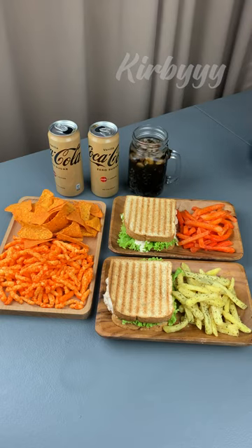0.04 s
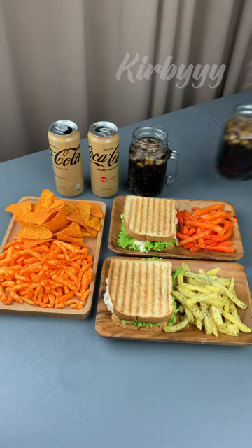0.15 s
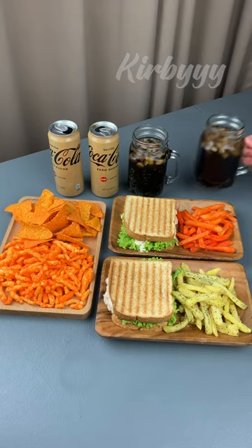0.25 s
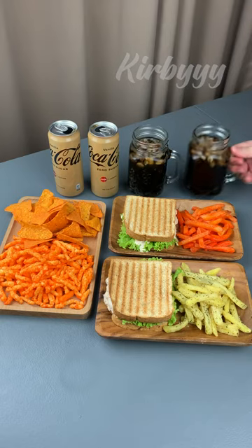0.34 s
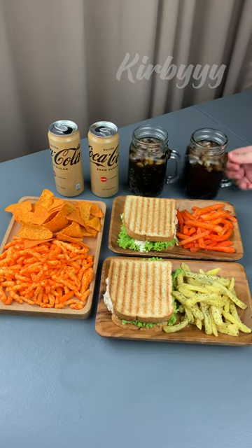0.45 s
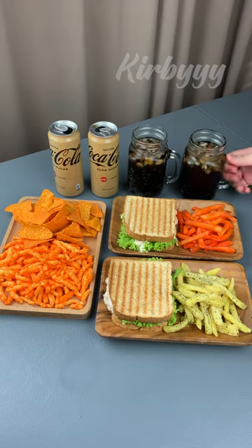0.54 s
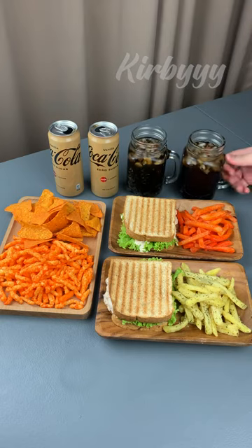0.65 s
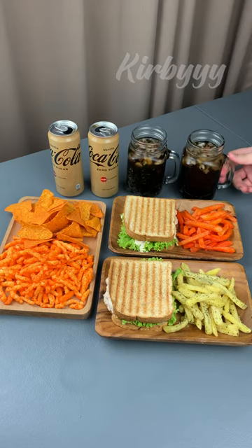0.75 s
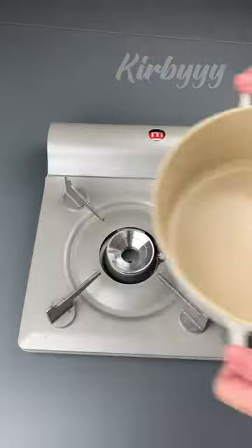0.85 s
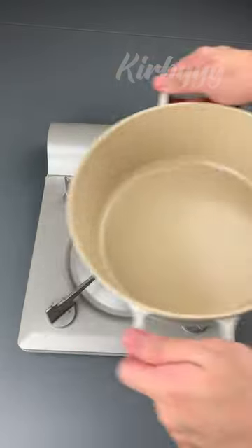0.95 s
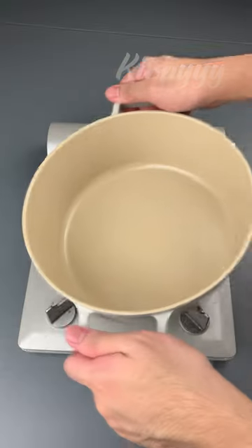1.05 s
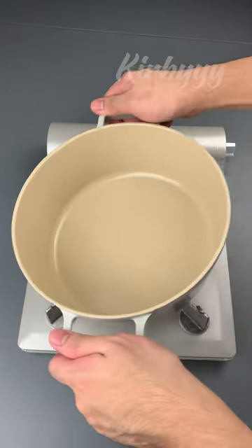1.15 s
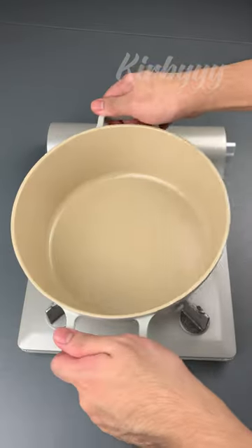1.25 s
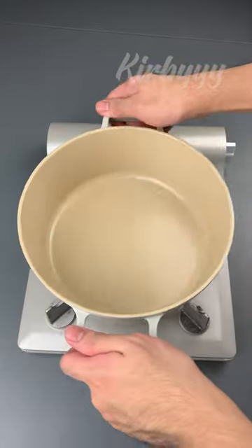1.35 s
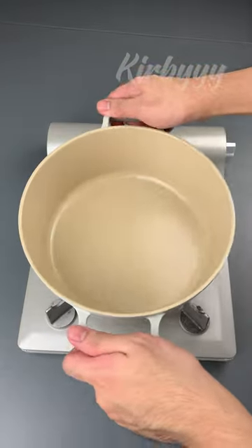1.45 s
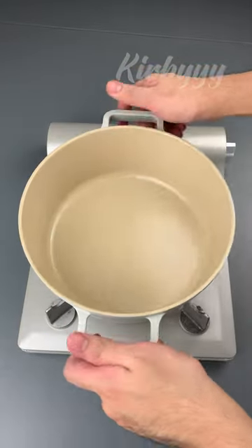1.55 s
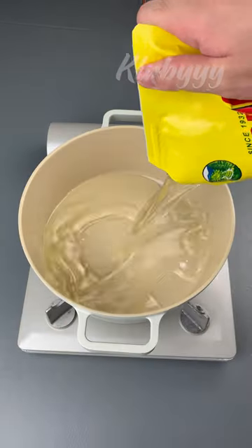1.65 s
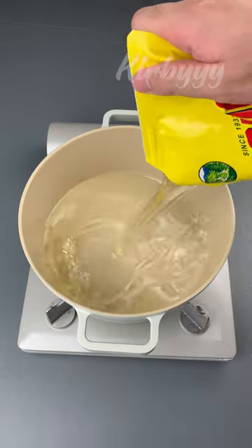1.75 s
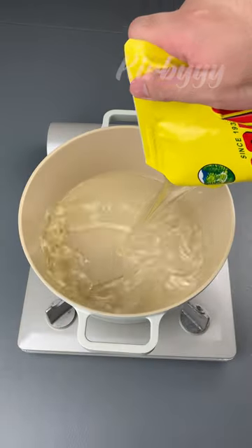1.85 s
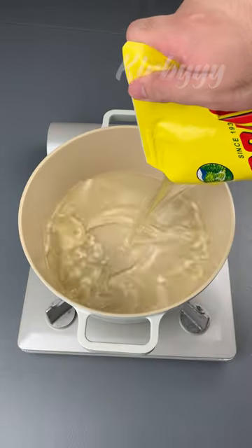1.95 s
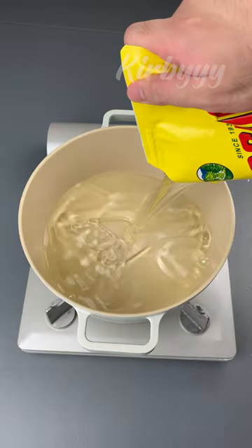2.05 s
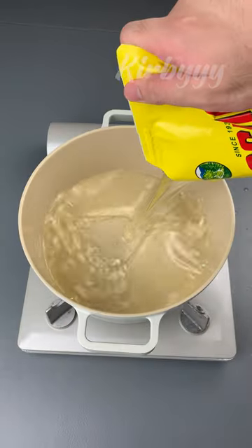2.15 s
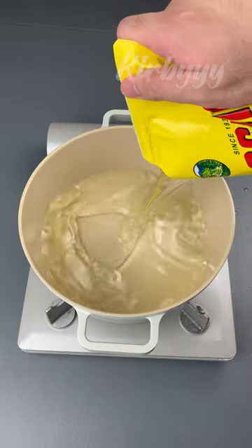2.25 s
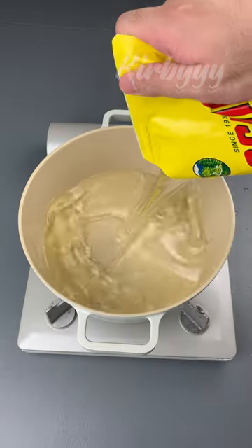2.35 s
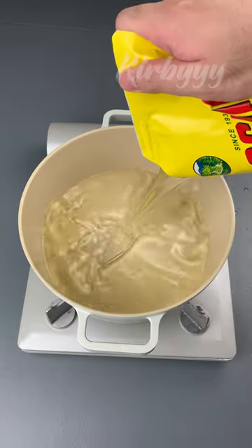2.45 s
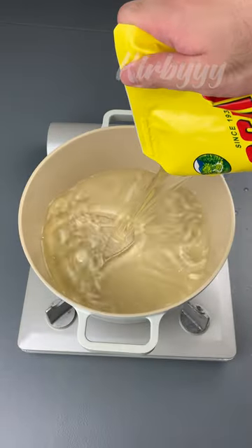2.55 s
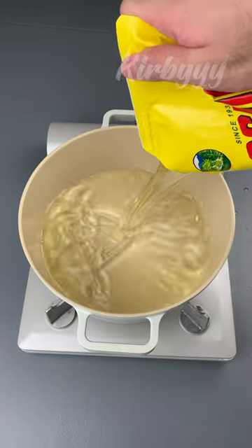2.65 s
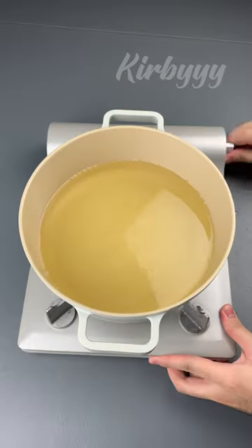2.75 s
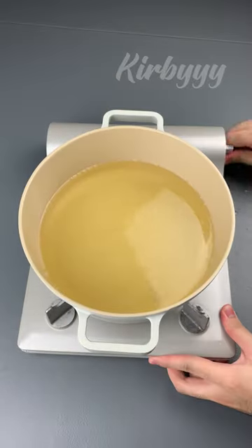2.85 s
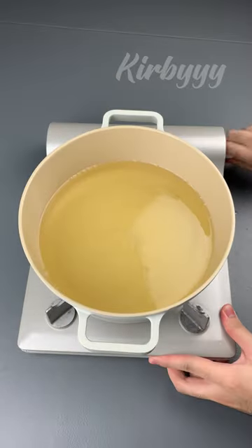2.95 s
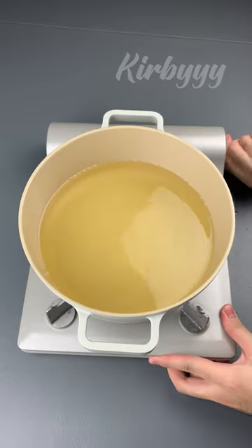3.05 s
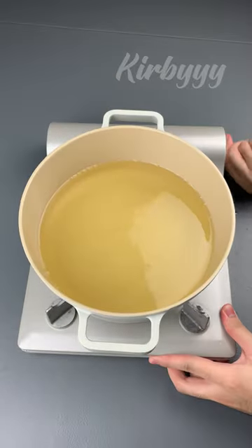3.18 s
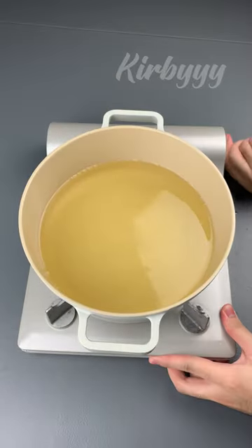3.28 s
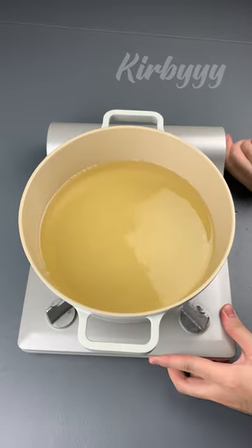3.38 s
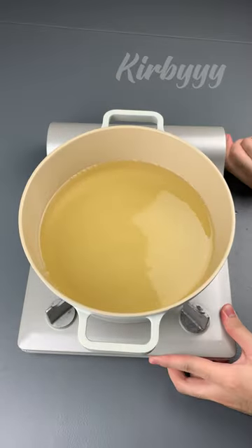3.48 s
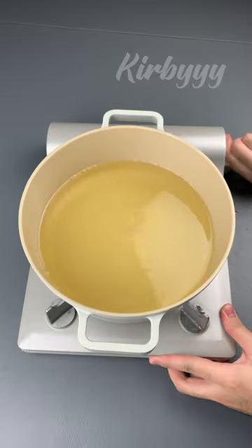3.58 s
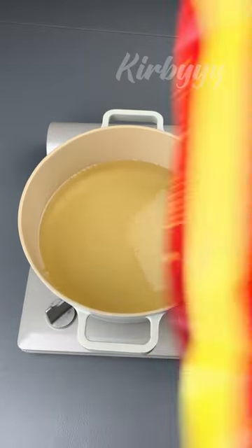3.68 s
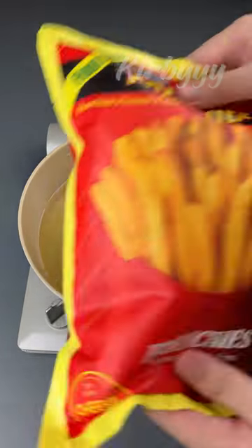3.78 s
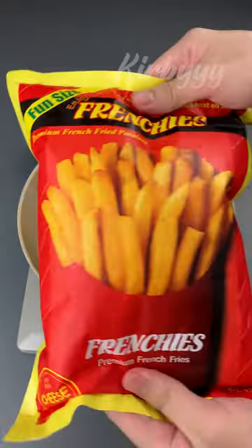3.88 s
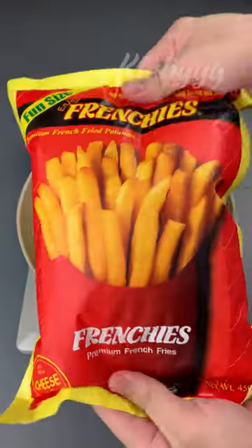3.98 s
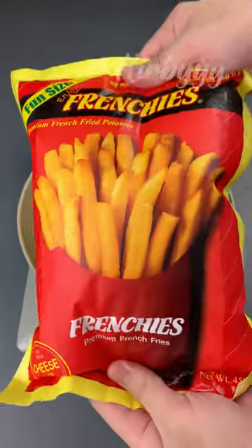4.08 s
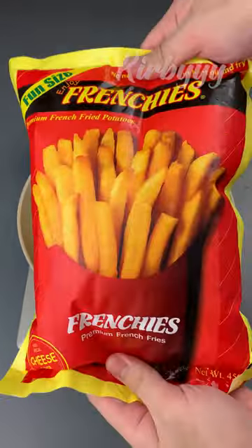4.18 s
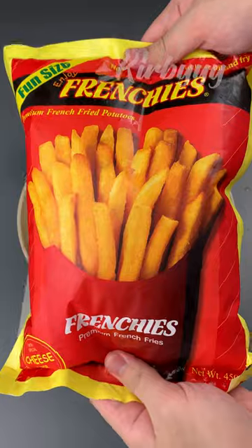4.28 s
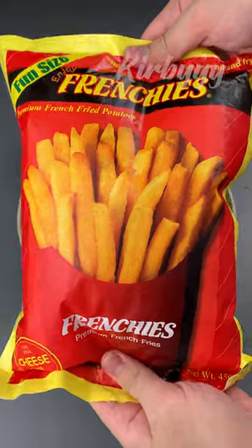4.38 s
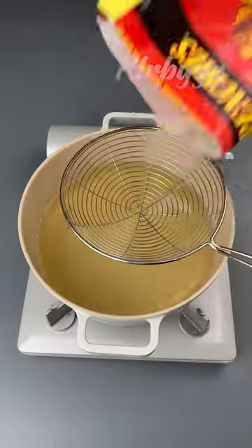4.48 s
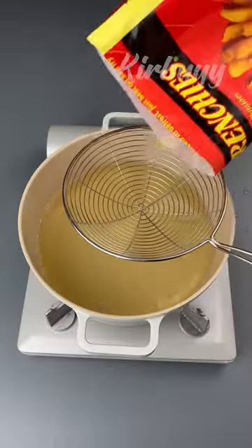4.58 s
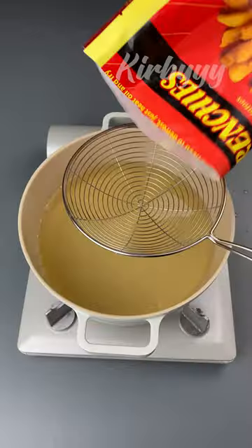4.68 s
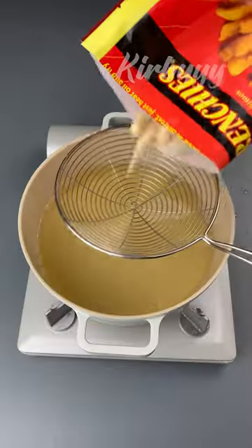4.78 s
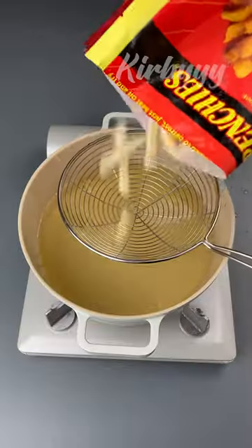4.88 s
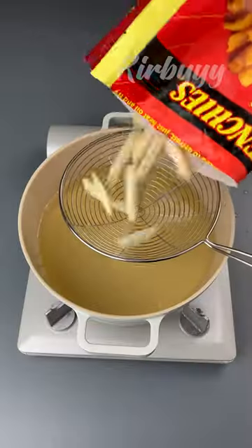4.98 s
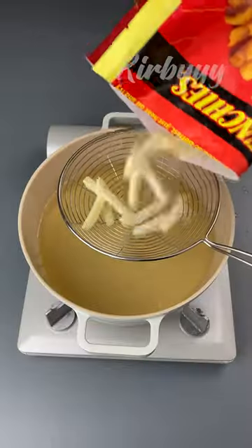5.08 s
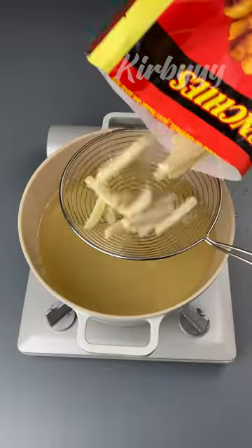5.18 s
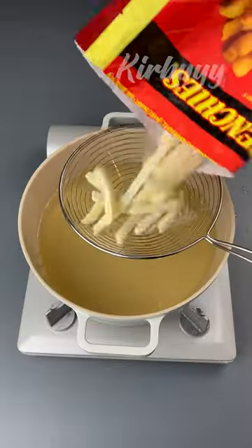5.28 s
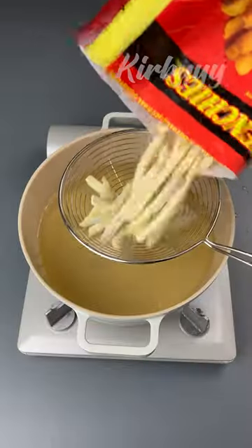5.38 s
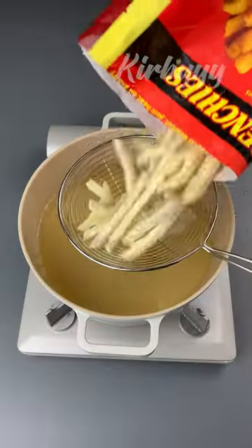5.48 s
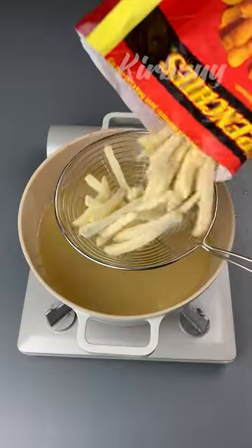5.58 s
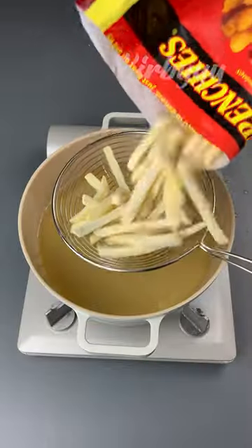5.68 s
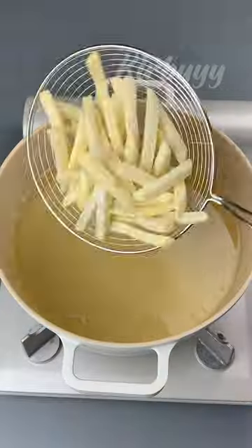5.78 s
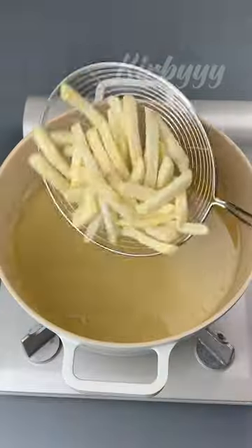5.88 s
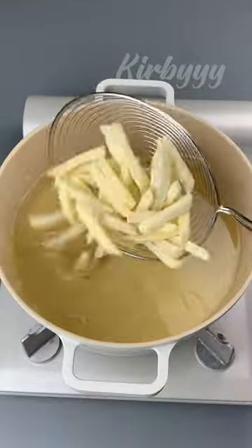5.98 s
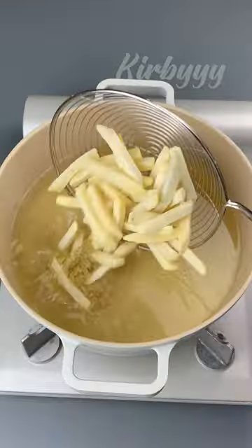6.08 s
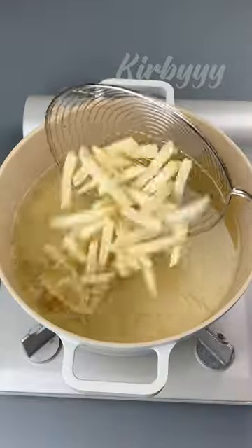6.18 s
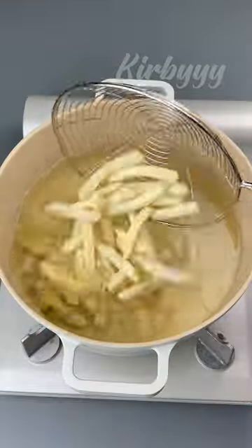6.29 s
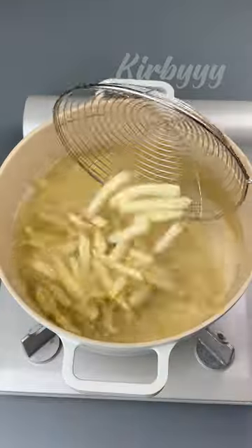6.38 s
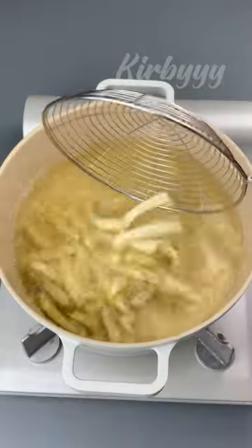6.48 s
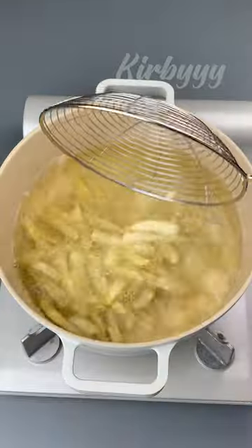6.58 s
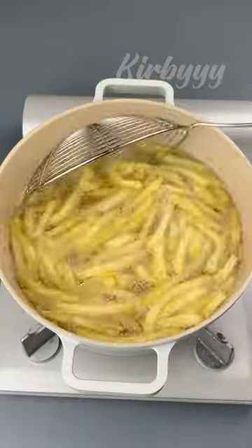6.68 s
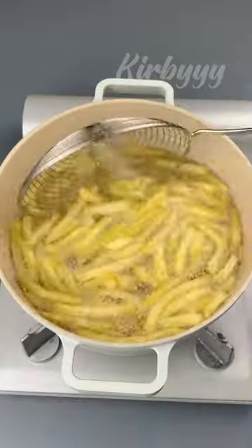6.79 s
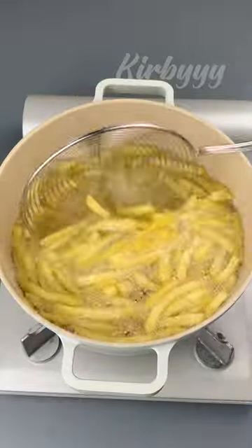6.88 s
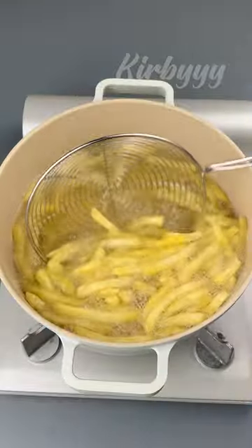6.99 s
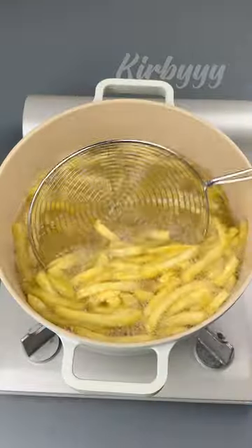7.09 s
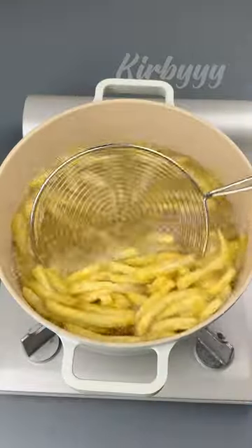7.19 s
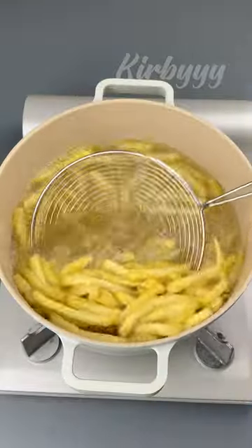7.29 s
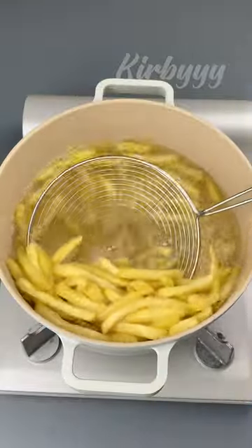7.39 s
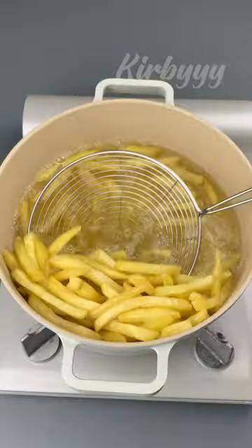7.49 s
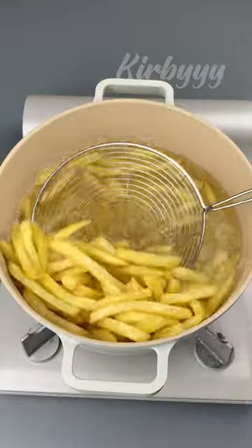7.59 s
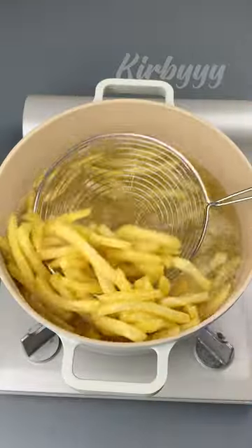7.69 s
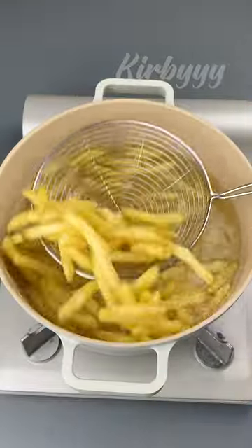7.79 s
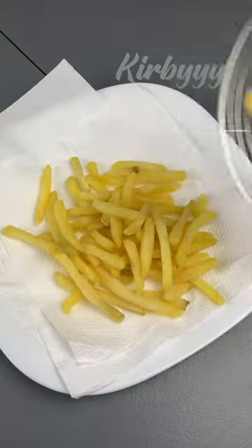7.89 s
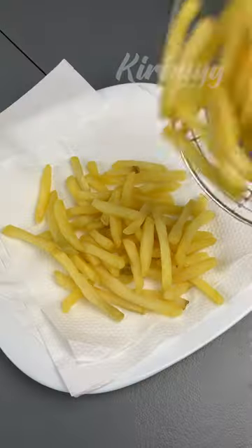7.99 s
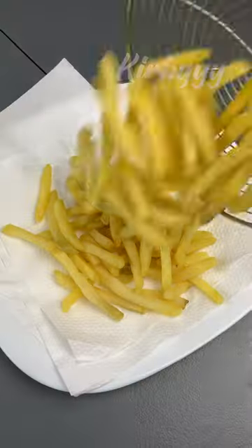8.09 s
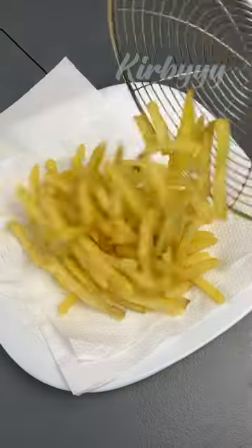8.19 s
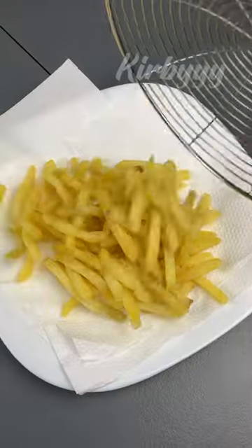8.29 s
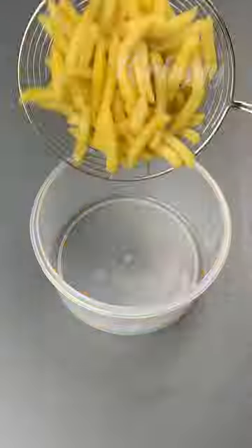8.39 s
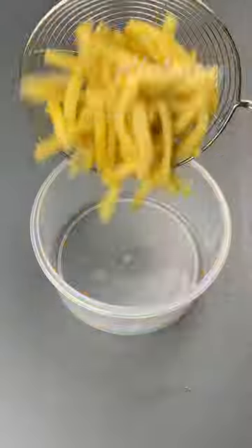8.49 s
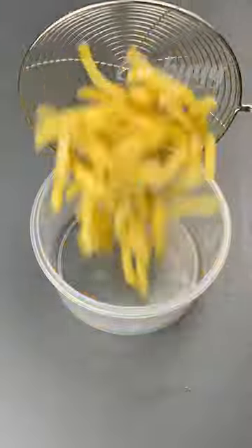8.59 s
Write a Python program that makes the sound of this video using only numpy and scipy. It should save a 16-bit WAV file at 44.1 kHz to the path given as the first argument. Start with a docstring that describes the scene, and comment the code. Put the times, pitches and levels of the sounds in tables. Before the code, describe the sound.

Abruptly cut kitchen moments: glass thud, ringing pot, oil pour, igniter snap, loud plastic crinkling, frozen fries clattering, fierce sizzle, rustling onto a plate, tub knocks.

```python
"""Frozen fries crackle out of a plastic bag, tumble into a wire strainer, sizzle in oil, slide onto a plate, drum in a tub.
Before them a glass of iced drink is set down, an iron pot lands on a camping stove, oil glugs and the burner lights.
Contacts are noise bursts with ringing modes; frying, plastic, flame and sliding are showers of tiny noise grains.
Bubbles, drip squeaks and glugs are gliding sines. The action plays in short moments with kitchen echo, each breaking
off abruptly, over steady room air and a low table rumble."""
import sys
import numpy as np
from scipy import signal
from scipy.fft import rfft, irfft
from scipy.io import wavfile
from scipy.ndimage import uniform_filter1d

SR = 44100
rng = np.random.default_rng(int(sys.argv[2]) if len(sys.argv) > 2 else 0)


def to_wav(s):
    """Save 16-bit WAV."""
    ch = np.atleast_2d(s).T  # columns
    pcm = np.round(np.clip(ch, -1, 1) * 32767)  # PCM
    wavfile.write(sys.argv[1], SR, pcm.astype(np.int16))


N = 381024

# Contacts; levels are relative, before each layer's own gain.
# ice shifting in the glass: [t/s, level/dB]
ICE_CLINKS = [(0.228, -42), (0.266, -37.5), (0.302, -40.5), (0.553, -17), (0.591, -30.5)]
# the glass meeting the table: [t/s, level/dB]
GLASS_KNOCKS = [(0.414, -3.5), (0.422, -1.5), (0.449, -9.5)]
# the pot landing and rocking: [t/s, level/dB, brightness tilt/(dB per octave)]
POT_KNOCKS = [(1.163, 3.5, -0.2), (1.176, 1.5, -3), (1.284, -16.5, -6), (1.373, -5.5, 5), (1.377, 0.5, 1.5),
              (1.409, -14.5, -0.5)]
# knob and igniter: [t/s, level/dB, added ring level of the stove/dB]
STOVE_CLICKS = [(2.744, -28.5, -1.5), (2.893, -18.5, -40), (3.053, -25.5, 1.5), (3.175, 6, -18),
                (3.509, -21.5, -1.5)]
# creases of the oil pouch: [t/s, level/dB]
POUCH_TICKS = [(1.678, -25), (1.718, -22), (1.727, -15.5), (1.785, -19.5), (1.815, -24), (1.887, -27),
               (1.929, -24.5), (2.06, -33), (2.16, -46), (2.573, -20)]
# the loudest creases of the bag: [t/s, level/dB]
BAG_SNAPS = [(3.719, 0), (3.730, 1), (3.7525, 2), (3.773, -1.5), (3.813, -2.5), (3.834, -7.5),
             (3.887, -10.5), (3.9, 0.5), (3.938, -12), (3.989, 4), (4.0135, -4.5), (4.02, 0), (4.05, 0.5),
             (4.057, -2), (4.083, 0.5), (4.107, -7), (4.1666, -5.5), (4.182, -4), (4.2, -11.5), (4.227, -5),
             (4.318, -5), (4.332, -6.5), (4.368, -4.5), (4.383, 1.5), (4.448, -12), (4.477, -4),
             (4.5076, -4.5), (4.528, 0.5), (4.6026, -3.5), (4.6516, -1), (4.702, -9), (4.758, -6.5)]
# frozen fries striking the wire: [t/s, level/dB]
FRY_DROPS = [(4.885, -17.5), (4.946, -6), (5.047, -10.5), (5.063, -18), (5.107, -16), (5.205, -8),
             (5.288, -14.5), (5.376, -7.5), (5.392, -20), (5.406, -16), (5.517, -11)]
# the strainer against the pot: [t/s, level/dB]
STRAINER_KNOCKS = [(6.862, -4), (7.848, -32.5)]
# the strainer against the plate: [t/s, level/dB]
PLATE_CLINKS = [(8.295, -9.5)]
# fries landing in the tub: [t/s, level/dB, added ring level of the tub/dB]
TUB_KNOCKS = [(8.585, 15, -12), (8.614, 1.5, -6), (8.617, 11, -19), (8.628, -6, 4), (8.633, 6.5, -1)]
# clumps of fries hitting the oil: [t/s, level/dB]
PLOPS = [(6.017, -29), (6.06, -27), (6.114, -20.5), (6.173, -19), (6.221, -24), (6.303, -12), (6.44, -23),
         (6.462, -33), (6.523, -27)]
# water drops spitting in the hot oil: [t/s, level/dB]
SPITS = [(5.898, -28), (6.072, -5), (6.115, -9)]

# oil slapping back in the spout: [t/s, level/dB]
GLUGS = [(1.944, -32), (2.051, -23.5), (2.274, -13), (2.48, 3)]
# the glug's dive above its lowest pitch (Hz), decay at 0 dB (s), rise in level that halves the decay (dB)
GLUG_DIVE_HZ, GLUG_T60, GLUG_HALVING_DB = 2420, 0.022, 18.5
# the loudest bubbles and drip squeaks: [t/s, level/dB, starting f/Hz, pitch rise/(octaves per s)]
BUBBLES = [(1.719, -22.5, 2565, 5.5), (1.814, -30.5, 3180, 2), (1.946, -31.5, 1143, 7),
           (2.061, -34.5, 2305, -4), (2.574, -15, 5250, 2), (2.601, -15, 5320, -0.5),
           (2.659, -13.5, 1015, 12.5), (2.740, -24, 697, 6.5), (6.058, -19, 923, 7), (6.223, -18, 927, 8),
           (6.308, -16, 1175, 10.5)]
BUBBLE_T60 = 0.087  # s

# What rings, as modes: [f/Hz, level/dB, t60/s]
TABLE_MODES = [(113.2, -4, 0.36), (183, -0.5, 0.38), (298, -13, 0.38), (393, -7.5, 0.42), (440, -9.5, 0.56),
               (820, -54, 5), (960, -11.5, 0.14), (1226, -17.5, 0.2), (1510, -27.5, 0.35)]
ICE_MODES = [(6360, -1.5, 0.1), (7150, -4, 0.11), (2480, 0.5, 0.057), (790, -11.5, .2)]
POT_MODES = [(101.9, 0.5, 0.58), (170, -5, 0.72), (217, -5.5, 0.5), (460, -14.5, 0.56), (550, 5.5, 0.17),
             (930, 0, 0.25), (1163, -6, 0.83), (1300, -5, 0.33), (1590, -6.5, 0.21), (1644, -7.5, 0.39),
             (1768, 1, 0.39), (2300, -15, .25), (2860, 1.5, 0.39), (3040, -15.5, 0.36), (3300, -18.5, 0.28),
             (3610, -16, 0.82), (4350, -1, 0.28), (4290, -8.5, 0.45), (4860, -16, .35), (5770, -6, 0.28),
             (5999, -7, 0.25), (6130, -5, .28), (6290, -11, .25), (7300, -18, .3), (7973, -18, .25),
             (10480, -20.5, 0.38), (11060, -30, .3), (14740, -29, 0.32), (15155, -19.5, 0.26)]
FULL_POT_MODES = [(109.4, -3.5, 0.71), (441, -2, 0.16), (530, -14, 0.2), (1160, -8, 0.47),
                  (1875, -25, 0.55), (3639, -26, 0.34), (6170, -24, 0.22)]
STOVE_MODES = [(106.3, -15.5, 0.33), (636, -6, 0.13), (777, -1.5, 0.069), (1160, -7.5, 0.075),
               (1330, -10, 0.064)]
PLATE_MODES = [(344, -1, 0.43), (780, -11.5, 0.66), (1300, -14, 0.66), (1888, -2.5, 0.46), (3305, -20, 0.3),
               (4075, -4, 0.19), (6654, -20, 0.26), (7140, -13, 0.26)]
TUB_MODES = [(282, -10, 0.071), (674, -6.5, 0.021), (1460, -9.5, 0.014), (1930, -6, 0.018),
             (2290, -20, 0.026), (3290, -17, 0.057)]
WIRE_MODES = [(1115, -6, 0.083), (1320, -0.5, 0.083), (2770, -5.5, 0.25), (4200, -10, 0.089),
              (6550, -4, 0.14)]  # the strainer's mesh
POT_HOLLOW = [(518, -6.5, 0.12), (577, 3, 0.087), (953, -8, 0.054), (1167, -2.5, .11)]  # the air above the oil

# Spectral colours of contacts and showers: [f/Hz, relative level/dB]
ICE_TONE = [(410, -15), (700, -3), (1350, 0), (3460, -13.5), (4860, -18), (6830, -29), (14600, -52),
            (16000, -33.5)]
GLASS_TONE = [(29, -31.5), (50, -6.5), (152, 5.5), (306, -9.5), (483, -6), (1240, -21), (1700, -22),
              (1910, -22), (3100, -22.5), (4670, -30.5), (5670, -37), (16000, -54)]
POT_TONE = [(35, -29.5), (60, -12.5), (121, -1.5), (315, -20), (527, 3), (767, -5.5), (882, -6.5),
            (1780, -3.5), (2190, -18.5), (2900, -3), (3120, -12.5), (5860, -7.5), (16000, -33.5)]
STOVE_TONE = [(88, -56), (150, -17), (431, -17.5), (745, -2.5), (1040, -7), (3620, -9), (4760, -14),
              (6140, -12), (11500, -17), (12900, -10.5), (16000, -23)]
CASING_TONE = [(200, -11), (700, 7.5), (1500, 4.5), (3500, 1.5), (7000, -2.5), (11000, -8.5), (16000, -3)]
POUCH_TONE = [(500, -15.5), (1200, 2), (2700, -3.5), (4500, -1), (7000, -7.5), (16000, -3.5)]
GLUG_TONE = [(120, -77), (200, 17), (1180, 1), (2470, -67), (2800, 4.5), (4770, -9), (6520, -5),
             (8900, -50), (16000, -20.5)]
FLAME_TONE = [(29, -61), (50, -46), (113, 0), (139, 6), (531, -0.5), (570, -4), (639, -8), (1070, -20),
              (1500, -17), (1950, -22), (3300, -120)]
BAG_TONE = [(47, -31), (80, -4.5), (369, 3), (702, 0), (1050, 7.5), (1400, -7), (3700, -14.5), (4730, -7.5),
            (6170, -11), (8990, -42), (10500, -17), (13100, -54), (16000, -13.5)]
BAG_HOLLOW = [(120, -14), (350, 1), (1000, -13), (2000, -1), (4000, -1.5), (16000, -26)]
SNAP_TONE = [(100, -10), (400, -9), (1000, 9.5), (3000, 4), (6000, 5.5), (16000, 2)]
TUMBLE_TONE = [(35, -31), (60, -18), (168, -1.5), (299, -5.5), (550, -4), (685, -10), (826, -3),
               (1130, -0.5), (1490, -7), (2500, -17.5), (3250, -34), (5500, -120)]
RUSTLE_TONE = [(1000, -9), (2200, -2), (3500, -1), (5000, 1), (7000, -0.5), (9000, 1), (12000, 0),
               (15200, 1), (16000, -3)]
FIZZ_TONE = [(900, -20), (1800, -5), (3300, -2), (5000, -2.5), (7000, -0.5), (9000, 1.5), (13000, 1.5),
             (15500, 3), (16000, -17)]
CHURN_TONE = [(150, -59.5), (250, -17.5), (486, -8.5), (572, -4), (699, -6), (1150, -7), (1430, -13),
              (2200, -15), (2860, -77), (4840, -120)]
SPLASH_TONE = [(150, -10), (450, -5.5), (1300, 5.5), (3000, -1), (6000, -27)]
STRAINER_TONE = [(47, -40), (80, 11), (451, -28), (877, -15), (1140, -3), (1460, -18), (6890, -13.5),
                 (8790, -28), (11000, -11), (16000, -37)]
PLATE_TONE = [(290, -42), (500, -6.5), (1180, -26), (1900, 4.5), (2570, -16), (3390, 11.5), (4600, -30),
              (6510, 2), (8830, -27), (16000, -45)]
TUB_TONE = [(47, -57), (80, -13), (277, 4), (471, -9), (1090, -19), (1430, -7), (3320, -24), (4730, -19.5),
            (16000, -46)]
THUD_TONE = [(18, -43.5), (30, -24), (57, -2.5), (102, -0.5), (168, -3.5), (198, -9.5), (367, -19.5),
             (400, -15), (520, -46.5), (880, -120)]
# still room air: [f/Hz, relative level/dB]
FLOOR_TONE = [(15, -43.5), (25, -1.5), (84, 9.5), (714, -20), (1190, -17.5), (1330, -15), (6380, -27),
              (9320, -27), (14800, -25.5), (16000, -35.5)]
FLOOR_DB = -58.5

# Gestures, each one row: [t/s, hold/s, level/dB]
POUR = (1.62, 0.97, -55.5)
FLAME = (3.19, .3, -28.5)
FIRST_DROPS = (5.83, 0.17, -56.5)
DUNK = (5.91, 0.21, -24)
SIMMER = (6.69, 1.2, -42)
SLIDE = (7.86, 0.31, -32.5)
SPILL = (8.05, 0.099, -26.5)
TIP = (8.44, .2, -34)
LANDING = (8.58, .06, -16)
# squeezes of the bag: [t/s, hold/s, level/dB]
SQUEEZES = [(3.703, .13, -16.5), (3.88, 0.024, -15), (3.984, 0.05, -18.5), (4.18, 0.051, -23.5),
            (4.365, 0.091, -29.5)]
# shakes that send fries out of the bag: [t/s, hold/s, knocking level/dB, scraping level/dB]
SHAKES = [(4.595, .005, -20.5, -41), (4.645, 0.012, -18.5, -29.5), (4.706, 0.13, -25.5, -35.5),
          (4.89, 0.14, -31.5, -22.5), (5.018, 0.4, -24, -27.5), (5.509, 0.02, -26, -24),
          (5.553, 0.26, -30, -33.5)]
# hands moving things on the table: [t/s, hold/s, level/dB]
HANDS = [(0.69, 0.75, -39), (2.7, 7.1, -39)]

# how long the kitchen echoes: [f/Hz, t60/s]
ROOM_T60 = [(100, 1), (400, 0.68), (1500, 0.62), (4000, 0.54), (8000, 0.41), (16000, 0.12)]
# stereo width: [f/Hz, side gain/dB]
WIDTH = [(100, -22), (400, -5), (1000, -5.5), (2500, 4.5), (5000, -34.5), (16000, -13)]
# phase between left and right: [f/Hz, phase/rad]
STEREO_PHASE = [(0, 0), (500, -.55), (1500, -.6), (2500, .6), (3800, 1.5), (4700, 3.14), (16000, 19.9)]
EDGE_HZ = 16000  # upper band limit


def amp(db):
    """Decibels to gain."""
    return 10 ** (np.asarray(db) / 20)


def evened(x):
    """Scales to rms 1."""
    return x / np.sqrt(np.mean(x ** 2) + 1e-20)


def read(points, hz):
    """Reads a table on a log-frequency axis."""
    f, value = np.transpose(points)
    return np.interp(np.log(hz + 1), np.log(f + 1), value)


def add(mix, s, sound):
    """Mixes a sound in at time s."""
    part = mix[max(round(s * SR), 0):][:len(sound)]
    part += sound[:len(part)]


def dying(t, t60):
    """Falls by 60 dB in t60 seconds."""
    return np.exp(-np.log(1000) * t / max(t60, 1e-3))


def coloured(x, tone, tilt_db=0, size=2048):
    """Causal filter of unit energy shaped by the tone, tilted in dB per octave (easing off in the bass)."""
    hz = np.fft.rfftfreq(2 * size, 1 / SR)
    level_db = read(tone, hz) + tilt_db * np.log2(hz + 200)
    # folding the cepstrum gives minimum phase: the energy comes first
    cepstrum = irfft(np.log(amp(level_db) + 1e-6))
    cepstrum[1:size] *= 2
    cepstrum[size + 1:] = 0
    taps = irfft(np.exp(rfft(cepstrum)))[:size]
    return signal.oaconvolve(x, taps / np.linalg.norm(taps))[:len(x)]


def uneven(tone, depth_db, count=14):
    """A colour with chance humps and dips: no two creases or contacts sound quite alike."""
    hz = np.geomspace(60, 16000, 2 * count)
    return np.transpose([hz, read(tone, hz) + depth_db * rng.standard_normal(len(hz))])


def blows(rows, tone, gain_db, t60, tilt_db=0, modes=(), ring_db=0, rise_s=0.0006, vary_db=0, size=32768):
    """Each contact is a brief dense clatter, together with the dying ring of the object's modes."""
    out, t = np.zeros(N), np.arange(size) / SR
    partials = [amp(db) * dying(t, ring_s) * np.sin(2 * np.pi * hz * t) for hz, db, ring_s in modes]
    span = t[:size // 4]
    settings = np.broadcast(tilt_db, ring_db + np.zeros(len(rows)))
    for (s, db, *_), (tilt, ring) in zip(rows, settings):
        clatter = rng.standard_normal(len(span)) * dying(span, t60) * (1 - np.exp(-span / rise_s))
        colour = uneven(tone, vary_db) if vary_db else tone
        add(out, s, amp(db + gain_db) * coloured(clatter, colour, tilt))
        if modes:  # each mode takes a chance sign, as if struck in another place
            add(out, s, amp(db + ring) * sum(rng.choice([-1, 1]) * p for p in partials))
    return out


def grains(level, tone, gain_db, per_s, spread_db, t60):
    """A shower of tiny noise bursts of uneven size, following a gain over time."""
    a, b = np.flatnonzero(level > level.max() / 1000)[[0, -1]]  # only the audible stretch
    out, age = np.zeros(N), np.arange(512) / SR
    loudness = amp(spread_db * np.minimum(rng.exponential(1, N), 4))
    struck = rng.random(N) < per_s / SR
    size = loudness * struck * rng.choice([-1, 1], N)
    shapes = rng.standard_normal((12, len(age))) * dying(age, t60)
    kind = rng.integers(0, len(shapes), N)
    shower = 0
    for k, shape in enumerate(shapes):
        shower = shower + signal.oaconvolve(size[a:b] * (kind[a:b] == k), evened(shape))[:b - a]
    out[a:b] = evened(coloured(shower, tone))
    return out * level * amp(gain_db)


def swells(rows, attack_s, release_s):
    """Gain over time of gestures (s, hold s, dB): each rises, holds, then falls 60 dB in release_s."""
    t, power = np.arange(0, N, 32) / SR, 0
    for s, hold_s, db in rows:
        rise = np.clip((t - s) / attack_s, 0, 1)
        fall = dying(np.maximum(t - s - attack_s - hold_s, 0), release_s)
        power = power + (amp(db) * rise * fall) ** 2
    return np.interp(np.arange(N) / SR, t, np.sqrt(power))


def wake(hits, gain_db, release_s, attack_s=.004):
    """Gain over time of what each hit stirs up, in proportion to its strength."""
    return swells([(s, 0, db + gain_db) for s, db, *_ in hits], attack_s, release_s)


def room(size=32768):
    """The kitchen's echo, left and right: sparse noise, each band dying at its own speed."""
    t = np.arange(size) / SR
    sparse = rng.standard_normal((2, size)) * (rng.random((2, size)) < .1)
    hz, age, bands = signal.stft(sparse, SR, nperseg=256)
    decay = np.exp(-np.log(1000) * age / read(ROOM_T60, hz)[:, None])
    tail = signal.istft(bands * decay, SR, nperseg=256)[1][:, :size]
    tail = tail * (t > .002) * (1 + 4.8 * dying(t, 0.039))  # table and walls answer first
    return tail / np.linalg.norm(tail[0])


def moment(x, start, end, wet_db, pan_db):
    """One stretch of the action with its echo, breaking off at its end; positive pan leans left."""
    a, b, out = round(start * SR), min(round(end * SR), N), np.zeros((2, N))
    echo = signal.fftconvolve(x[None, a:b], room(), axes=1)[:, :b - a]
    heard = x[a:b] + amp(wet_db) * echo
    cutoff = np.minimum(np.arange(b - a)[::-1] / 64, 1)  # a 64-sample fade avoids a click
    out[:, a:b] = heard * amp([[pan_db / 2], [-pan_db / 2]]) * cutoff
    return out


def burning():
    """Gain of the gas flame: it catches, holds and dies down."""
    return swells([FLAME], attack_s=0.058, release_s=1.4)


def squeezing():
    """How hard the hands work the bag."""
    return swells(SQUEEZES, attack_s=0.0057, release_s=0.26)


def tumbling():
    """How hard the fries knock about after each shake."""
    return swells([(s, hold, db) for s, hold, db, _ in SHAKES], attack_s=0.0096, release_s=0.34)


def spilling():
    """A few fries slip off the strainer, then the whole heap follows."""
    slip = swells([SLIDE], attack_s=0.16, release_s=0.59)
    return slip + swells([SPILL], attack_s=0.054, release_s=0.4)


def background(stove_db=-6, bag_db=-9, tumble_db=-6, spill_db=0):
    """Still room air, and the low rumble that pot, strainer and moving things send through the table."""
    hands = swells(HANDS, attack_s=0.044, release_s=.5)
    knocks = wake(POT_KNOCKS, gain_db=-23, release_s=0.79) + wake(STRAINER_KNOCKS, gain_db=-24.5, release_s=0.85)
    moves = amp(stove_db) * burning() + amp(bag_db) * squeezing()
    moves = moves + amp(tumble_db) * tumbling() + amp(spill_db) * spilling()
    rumble = grains(hands + knocks + moves, THUD_TONE, gain_db=-8.0, per_s=300, spread_db=1.5, t60=0.0034)
    air = evened(coloured(rng.standard_normal(N), FLOOR_TONE))
    return amp(FLOOR_DB) * air + rumble


def drink():
    """A heavy glass thumps the table and sets its modes ringing; the ice shifts in it."""
    thump = blows(GLASS_KNOCKS, GLASS_TONE, gain_db=-1, t60=0.099,
                  modes=TABLE_MODES, ring_db=-13.0, rise_s=0.00019)
    ice = blows(ICE_CLINKS, ICE_TONE, gain_db=-3.5, t60=0.073, tilt_db=8.0,
                modes=ICE_MODES, ring_db=-19, rise_s=.0002)
    return thump + ice


def pot():
    """The empty pot lands on the burner's prongs, one side and then the other."""
    brightness = np.transpose(POT_KNOCKS)[2]
    return blows(POT_KNOCKS, POT_TONE, gain_db=1.5, t60=0.065, tilt_db=brightness,
                 modes=POT_MODES, ring_db=-24.0, rise_s=0.0053)


def stove(shiver_db=-26, shiver_t60=0.55):
    """The knob clicks round, the igniter's snap shakes the tin casing, and the gas catches with a flutter."""
    flame = grains(burning(), FLAME_TONE, gain_db=-3.0, per_s=400, spread_db=-0.5, t60=0.0036)
    clicks = blows(STOVE_CLICKS, STOVE_TONE, gain_db=-4, t60=.068,
                   modes=STOVE_MODES, ring_db=np.transpose(STOVE_CLICKS)[2], rise_s=0.0057)
    casing, t = np.zeros(N), np.arange(SR // 2) / SR
    for s, db, *_ in STOVE_CLICKS:
        add(casing, s, amp(db + shiver_db) * rng.standard_normal(len(t)) * dying(t, shiver_t60))
    return clicks + coloured(casing, CASING_TONE) + flame


def glugs(slap_db=-8, gulp_db=-5, fall_s=0.0042, low_hz=450):
    """Air gulps into the pouch: a wet slap and a pitch that dives as the cavity grows; harder is shorter."""
    out, t = np.zeros(N), np.arange(4096) / SR
    for s, db in GLUGS:
        t60 = GLUG_T60 * 2 ** (-db / GLUG_HALVING_DB)
        pitch = low_hz + GLUG_DIVE_HZ * np.exp(-t / fall_s)
        gulp = np.sin(2 * np.pi * np.cumsum(pitch) / SR)
        slap = coloured(rng.standard_normal(len(t)), GLUG_TONE)
        envelope = dying(t, t60) * (1 - dying(t, 0.028))
        add(out, s, amp(db + 3.5) * (amp(slap_db) * slap + amp(gulp_db) * gulp) * envelope)
    return out


def oil():
    """A soft stream that spatters after each glug, and the ticking of the squeezed pouch."""
    flow = swells([POUR], attack_s=.03, release_s=.5)
    flow = flow + wake(GLUGS, gain_db=-25, release_s=0.42) + wake(POUCH_TICKS, gain_db=-16.5, release_s=0.14)
    stream = grains(flow, POUCH_TONE, gain_db=-8.5, per_s=230, spread_db=6, t60=0.0099)
    return stream + glugs() + blows(POUCH_TICKS, POUCH_TONE, gain_db=-6, t60=0.017, vary_db=5.5)


def bubbles(waver=0.059, small_db=-42, small_hz=1900, small_rise=6, count=16):
    """Bubbles and drip squeaks ring at a wobbling, mostly rising pitch; the pour drags in small bubbles."""
    out, t = np.zeros(N), np.arange(6000) / SR
    small = []
    for when, depth, width in rng.random((count, 3)):
        hz = small_hz * 2 ** (2 * width - 1)
        small.append((POUR[0] + POUR[1] * when, small_db - 10 * depth, hz, small_rise))
    for s, db, hz, rise in BUBBLES + small:
        wobble = evened(uniform_filter1d(rng.standard_normal(len(t)), size=60))
        pitch = hz * 2 ** (rise * t) * (1 + waver * wobble)
        ring = np.sin(2 * np.pi * np.cumsum(pitch) / SR)
        add(out, s, amp(db) * ring * dying(t, BUBBLE_T60) * (1 - dying(t, 0.0013)))
    return out


def bag(hollow_db=-19, hollow_t60=0.052):
    """Creases in the plastic buckle, a few loudly and many faintly; each snap stirs the hollow bag."""
    crumple = grains(squeezing(), BAG_TONE, gain_db=-2, per_s=570, spread_db=5.0, t60=0.015)
    faint = grains(squeezing(), SNAP_TONE, gain_db=-14, per_s=120, spread_db=8.5, t60=0.005)
    snaps = blows(BAG_SNAPS, SNAP_TONE, gain_db=-2, t60=0.01, tilt_db=.5, rise_s=0.000076, vary_db=4.0)
    hollow = blows(BAG_SNAPS, BAG_HOLLOW, gain_db=hollow_db, t60=hollow_t60, rise_s=0.00075, vary_db=4.0)
    return snaps + faint + crumple + hollow


def serving(flow, patter_db, rustle_db):
    """Crisp fries patter and slide off the strainer."""
    patter = grains(flow, TUMBLE_TONE, gain_db=patter_db, per_s=600, spread_db=0, t60=.015)
    return patter + grains(flow, RUSTLE_TONE, gain_db=rustle_db, per_s=6100, spread_db=4.5, t60=0.0104)


def tub():
    """The strainer tips, and the fries drum on the bottom of the empty tub."""
    rustle = serving(swells([TIP], attack_s=0.0078, release_s=.3), patter_db=-21, rustle_db=-1.5)
    drumming = serving(swells([LANDING], attack_s=0.0042, release_s=.2), patter_db=-5.5, rustle_db=-11.5)
    knocks = blows(TUB_KNOCKS, TUB_TONE, gain_db=-5.0, t60=0.012,
                   modes=TUB_MODES, ring_db=np.transpose(TUB_KNOCKS)[2], rise_s=0.00042)
    return rustle + drumming + knocks


def plate():
    """Fries spill onto paper; the strainer clinks on the rim and shakes more loose."""
    clink = blows(PLATE_CLINKS, PLATE_TONE, gain_db=-1.5, t60=0.039,
                  modes=PLATE_MODES, ring_db=-16.5, rise_s=0.00036)
    flow = spilling() + wake(PLATE_CLINKS, gain_db=-11.5, release_s=.06)
    return clink + serving(flow, patter_db=-15.5, rustle_db=-2.5)


def frozen_fries():
    """Hard sticks knock on each other, scrape over plastic and ring the wire."""
    sliding = swells([(s, hold, db) for s, hold, _, db in SHAKES], attack_s=0.005, release_s=0.75)
    jostle = wake(FRY_DROPS, gain_db=-21, release_s=0.094)  # each drop shifts the heap
    knocks = grains(tumbling() + jostle, TUMBLE_TONE, gain_db=-2, per_s=170, spread_db=2, t60=0.038)
    scrape = grains(sliding + jostle, RUSTLE_TONE, gain_db=1.0, per_s=1400, spread_db=2.5, t60=0.015)
    drops = blows(FRY_DROPS, SNAP_TONE, gain_db=-4.5, t60=0.028,
                  modes=WIRE_MODES, ring_db=-15, vary_db=4.5)
    return knocks + scrape + drops


def frying(boil, churn_db, fizz_db):
    """Steam bubbles burst by the thousand over churning oil."""
    churn = grains(boil, CHURN_TONE, gain_db=churn_db, per_s=500, spread_db=0.5, t60=0.029)
    return churn + grains(boil, FIZZ_TONE, gain_db=fizz_db, per_s=5000, spread_db=2.7, t60=0.0038)


def splashes(gain_db=-10, ring_db=-5):
    """Each clump of fries hitting the oil sounds the hollow of the pot: one plop, then a spatter."""
    t, plops = np.arange(8192) / SR, np.zeros(N)
    hollow = sum(amp(db) * dying(t, t60) * np.sin(2 * np.pi * hz * t) for hz, db, t60 in POT_HOLLOW)
    for s, db in PLOPS:
        add(plops, s, amp(db + ring_db) * hollow * (1 - dying(t, 0.0096)))
    spatter = wake(PLOPS, gain_db=-0.5, release_s=0.39)
    slaps = grains(spatter, SPLASH_TONE, gain_db=gain_db, per_s=200, spread_db=2, t60=0.0062)
    wash = grains(spatter, CHURN_TONE, gain_db=-10.5, per_s=500, spread_db=3.5, t60=0.03)
    resounding = signal.oaconvolve(slaps, hollow / np.linalg.norm(hollow))[:N] / 2
    return plops + wash + resounding


def dunking():
    """The oil boils up as the frozen fries slide in, then slowly calms; water drops spit."""
    boil = swells([FIRST_DROPS], attack_s=.01, release_s=.5) + swells([DUNK], attack_s=0.21, release_s=3.3)
    boil = boil + wake(PLOPS, gain_db=-12.5, release_s=0.093)
    spits = blows(SPITS, FIZZ_TONE, gain_db=1.5, t60=0.0093, rise_s=0.00017)
    return frying(boil, churn_db=-12.5, fizz_db=1) + spits + splashes()


def simmering():
    """An even sizzle; the strainer bumps the pot and stirs the oil."""
    boil = swells([SIMMER], attack_s=.02, release_s=1) + wake(STRAINER_KNOCKS, gain_db=-20, release_s=0.14)
    bumps = blows(STRAINER_KNOCKS, STRAINER_TONE, gain_db=-9.0, t60=0.093,
                  modes=FULL_POT_MODES, ring_db=-13, rise_s=0.00026)
    return frying(boil, churn_db=-5.0, fizz_db=3) + bumps


def scene():
    """The moments in order, over the background; bubbles and squeaks span the pour to the dunk."""
    cuts = [0, .85, 1.638, 3.697, 5.842, 6.712, 7.88, 8.445, 8.64]  # s
    return (background()
            + moment(drink(), *cuts[0:2], wet_db=-3.5, pan_db=0.0)
            + moment(pot(), *cuts[1:3], wet_db=-4, pan_db=-1.5)
            + moment(oil() + stove(), *cuts[2:4], wet_db=-3.0, pan_db=-0.5)
            + moment(bubbles(), cuts[2], cuts[5], wet_db=-10.0, pan_db=-1.5)
            + moment(bag() + frozen_fries(), *cuts[3:5], wet_db=-7.5, pan_db=-2.3)
            + moment(dunking(), *cuts[4:6], wet_db=-7.5, pan_db=-0.9)
            + moment(simmering(), *cuts[5:7], wet_db=-5, pan_db=-0.8)
            + moment(plate(), *cuts[6:8], wet_db=-7, pan_db=-0.5)
            + moment(tub(), *cuts[7:9], wet_db=-8.5, pan_db=0.0))


def record(dry):
    """Stereo pickup: width by frequency, a phase shift between left and right, overload, band limit."""
    hz = np.fft.rfftfreq(N, 1 / SR)
    mid = rfft(dry[0] + dry[1]) / 2
    side = rfft(dry[0] - dry[1]) / 2 * amp(read(WIDTH, hz))
    turn = np.exp(.5j * np.interp(hz, *np.transpose(STEREO_PHASE)))  # half the shift to each channel
    stereo = irfft(np.array([(mid + side) * turn, (mid - side) / turn]), N)
    overloaded = np.clip(stereo, -1, 1)
    lowpass = signal.firwin(255, EDGE_HZ, window=("kaiser", 8), fs=SR)
    return signal.oaconvolve(overloaded, lowpass[None], "same")


dry = scene()
out = record(dry)
to_wav(out)
```